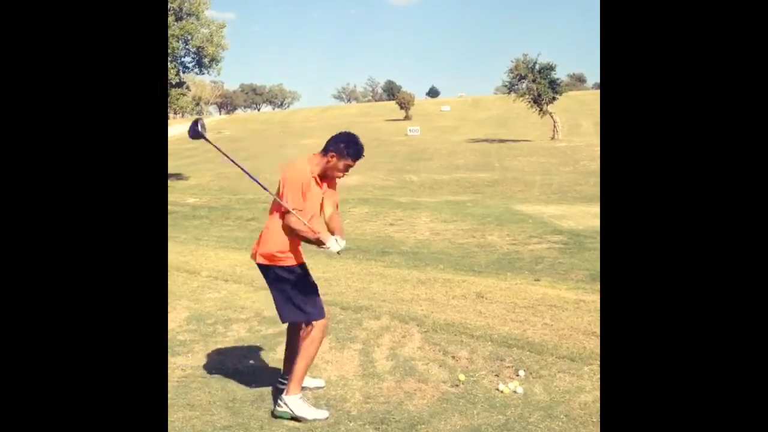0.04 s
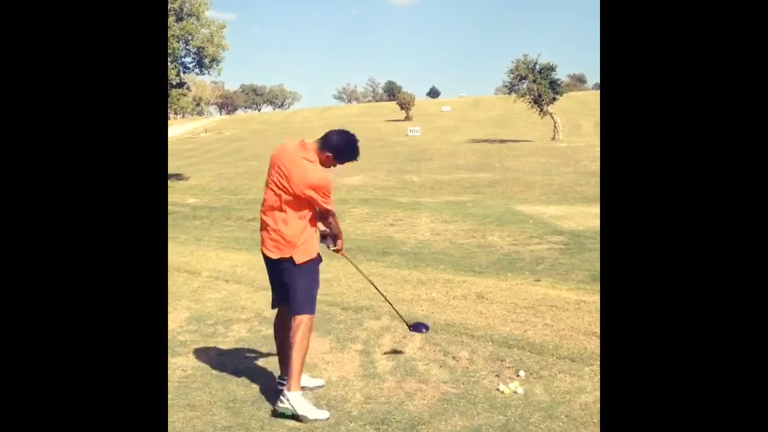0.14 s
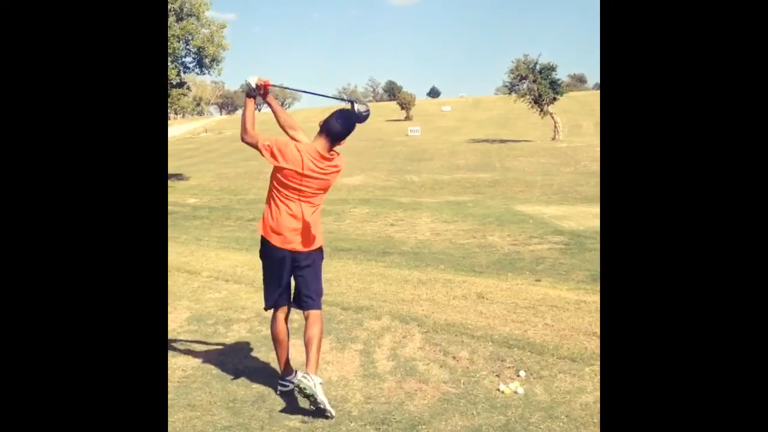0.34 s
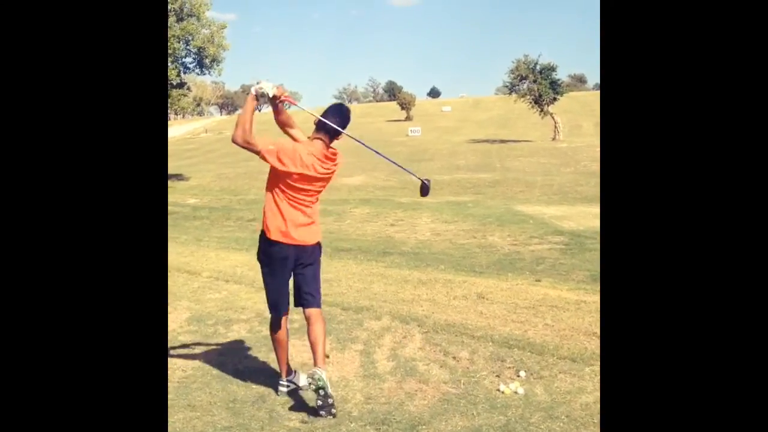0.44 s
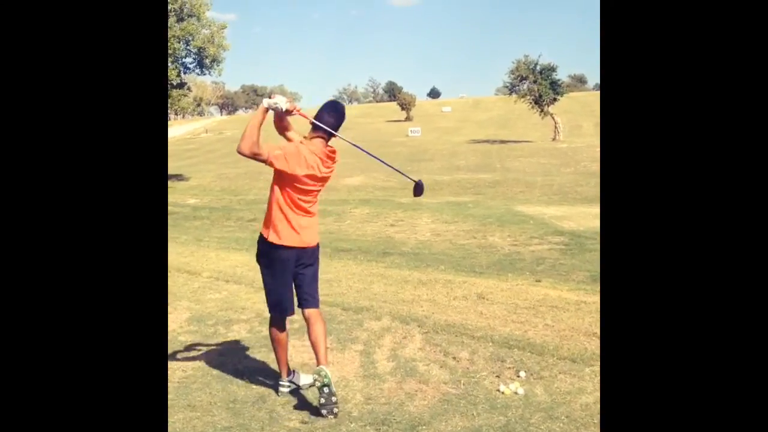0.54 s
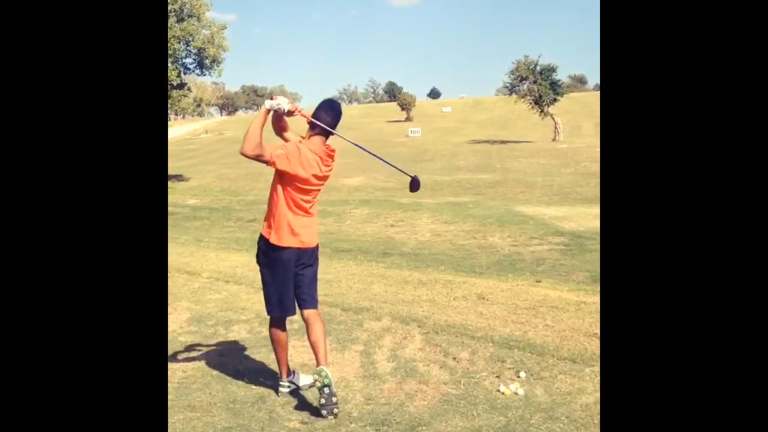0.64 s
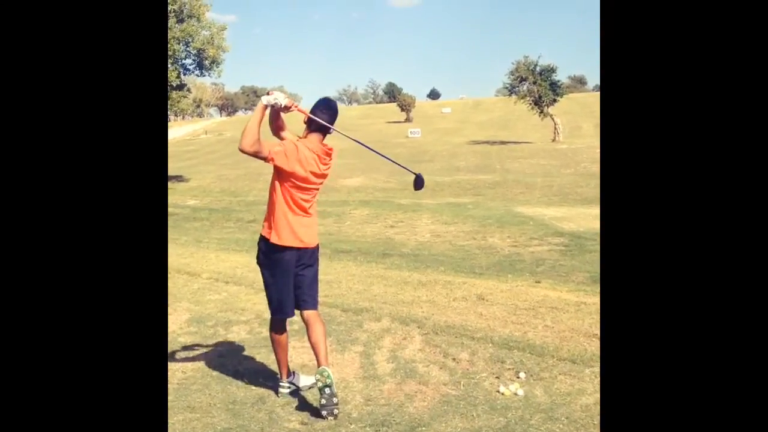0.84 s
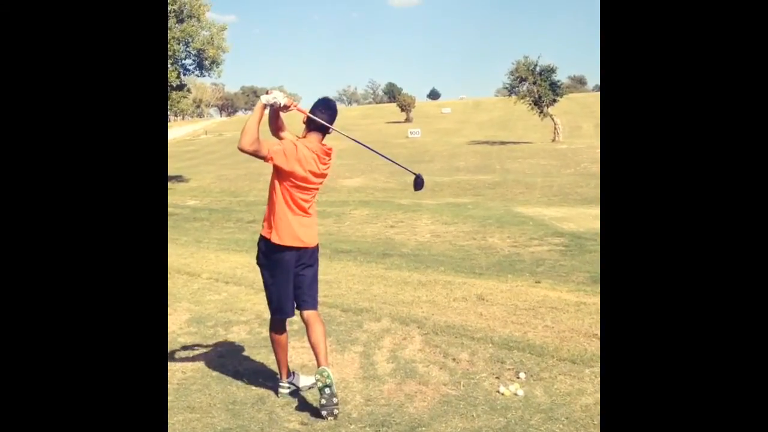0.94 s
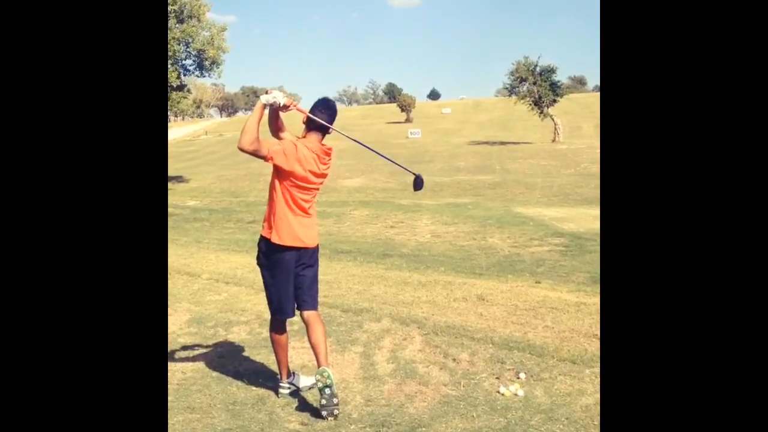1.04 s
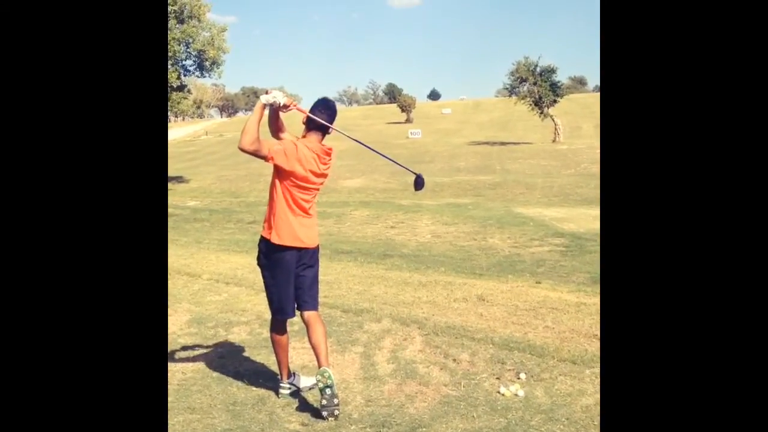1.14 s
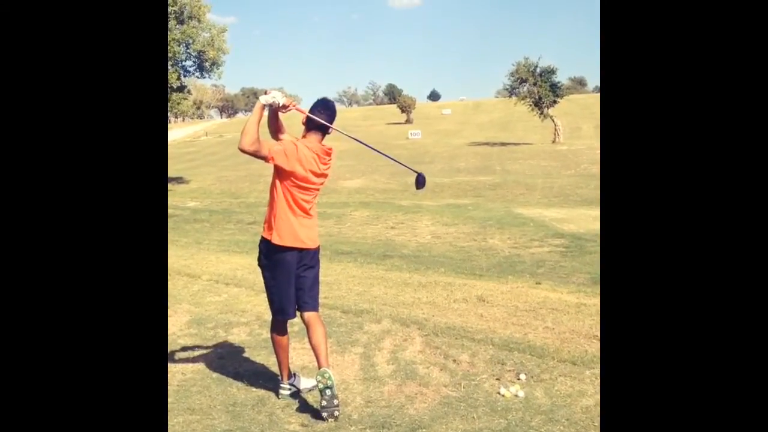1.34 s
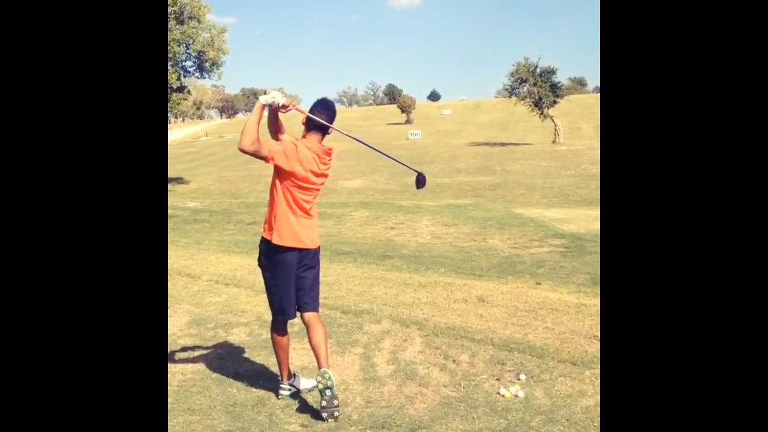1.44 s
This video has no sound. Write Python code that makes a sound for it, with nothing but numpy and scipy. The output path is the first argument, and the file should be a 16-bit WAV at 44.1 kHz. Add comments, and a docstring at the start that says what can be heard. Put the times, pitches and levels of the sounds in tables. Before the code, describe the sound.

One loud, bright golf shot outdoors: barely audible club swish, snappy metallic crack and quick high ping, faint scattered echo from distant trees, then soft rumbling wind buffets on the microphone and a few tiny ticks.

```python
"""A golf driver cracks against the ball on an open range and its hollow metal head pings on.
The hit is a sharp pulse, a low thud, bursts of coloured noise and a bank of decaying sines.
Shaped noise makes the swoosh before it, the scatter from the ground and the echo from far trees.
Light wind rocks the microphone with short low wavelets over rumble, distant hiss and a few ticks.
The recorder's gain drops at the hit and creeps back."""
import sys
import numpy as np
from scipy import signal
from scipy.fft import rfft, irfft
from scipy.io import wavfile
from scipy.ndimage import uniform_filter1d

SR = 44100
rng = np.random.default_rng(int(sys.argv[2]) if len(sys.argv) > 2 else 0)


def to_wav(sig):
    """Store sig (one row per channel, or 1-D mono) as 16-bit WAV at the path in sys.argv[1].

    Samples outside -1..1 are clipped; the rate is SR.
    """
    pcm = np.clip(np.atleast_2d(sig), -1, 1) * 32767
    pcm = np.round(pcm).astype(np.int16)
    wavfile.write(sys.argv[1], SR, pcm.T)  # frames by channels


N = 66150
T = np.arange(N) / SR  # seconds
HIT_S = 0.2063  # club meets ball


def amp(db):
    """Decibels to gain."""
    return 10 ** (np.asarray(db) / 20)


def unit(x):
    """Scales to rms 1."""
    return x / np.sqrt(np.mean(x ** 2) + 1e-20)


def noise(spectrum):
    """Noise of rms 1, coloured by points of (Hz, relative dB per Hz) joined on a log frequency axis."""
    points_hz, points_db = np.transpose(spectrum)
    hz = np.fft.rfftfreq(N, 1 / SR)
    colour_db = np.interp(np.log(hz + 1), np.log(points_hz), points_db)
    white = rfft(rng.standard_normal(N))
    return unit(irfft(white * amp(colour_db), N))


def level(curve):
    """Gain along a curve of (seconds, dB) points."""
    return amp(np.interp(T, *np.transpose(curve)))


def decay(start, t60, rise=0.00022, hold=0):
    """Envelope: linear rise, then exponential fall by 60 dB per t60, starting `hold` after the start."""
    t = T - start
    fall_db = -60 * np.maximum(t - hold, 0) / t60
    return np.clip(t / rise, 0, 1) * amp(fall_db)


SLAP_DB, SLAP_DELAY_S = 8.5, 0.00019
SLAP_HALF_S, SLAP_EDGE_S = 0.000093, 0.00004  # bell width; steepness of the swing through zero


def slap():
    """Push-pull pressure pulse as the ball flattens on the face: a steep step under a narrow bell."""
    t = T - HIT_S - SLAP_DELAY_S
    bell = np.exp(-(t / SLAP_HALF_S) ** 2)
    return -amp(SLAP_DB) * np.tanh(t / SLAP_EDGE_S) * bell


THUD_DB, THUD_HZ, THUD_S, THUD_DELAY_S = -18.5, 235, 0.0024, 0.0015


def thud():
    """Low push of air from the blow: a short cosine under a bell."""
    t = T - HIT_S - THUD_DELAY_S
    return amp(THUD_DB) * np.cos(2 * np.pi * THUD_HZ * t) * np.exp(-(t / THUD_S) ** 2)


# Colour of the crack. Each row: frequency in Hz, relative level in dB per Hz.
CRACK_COLOUR = [(40, -25), (200, -8.5), (500, -13.5), (850, 1.5), (1250, -12), (2000, -19.5), (3000, -5.5),
                (5000, -19.5), (6200, -2), (7500, -9.5), (9000, -8.5), (10300, -2), (11700, -13.5),
                (13000, -6), (15500, -19)]
CRACK_DB, CRACK_T60_S, CRACK_HOLD_S = -7.5, 0.015, 0.0022


def crack():
    """Dense, fast-dying ring of face and ball, as a burst of noise."""
    envelope = decay(HIT_S, CRACK_T60_S, rise=0.00038, hold=CRACK_HOLD_S)
    return amp(CRACK_DB) * noise(CRACK_COLOUR) * envelope


# Colour of the thin shell's sizzle. Each row: frequency in Hz, relative level in dB per Hz.
SIZZLE_COLOUR = [(1500, -25), (3000, -5.5), (4600, -2.5), (6200, -3), (7600, -6.5), (10000, -2.5),
                 (12000, -12.5), (15500, -15.5)]
SIZZLE_DB, SIZZLE_T60_S = -15.5, 0.051


def sizzle():
    """Crowded high modes of the thin shell, too dense to hear singly, so noise stands for them."""
    return amp(SIZZLE_DB) * noise(SIZZLE_COLOUR) * decay(HIT_S, SIZZLE_T60_S)


# Ringing modes of the hollow head.
# Each row: frequency at the hit in Hz, level in dB, time to fall 60 dB in seconds.
HEAD_MODES = [(793.4, -25, 0.02), (935, -18.5, 0.011), (3315, -25, 0.19), (3490, -29.5, 0.2),
              (4550, -28, 0.1), (5540, -23.5, .15), (5888, -7.5, .055), (6420, -20, 0.035),
              (6220, -12.5, .055), (6470, -21.5, 0.068), (6840, -32.5, .05), (7054, -27.5, .04),
              (8060, -18, .04), (9650, -24.5, 0.045), (10160, -22, .03), (10990, -18, 0.027)]
PING_RISE_S = 0.0028
DOPPLER_RISE, DOPPLER_S = 0.11, 0.055  # final pitch rise as a fraction; time constant of the glide


def ping():
    """Modes of the head as it flies away; their pitch rises as it slows and turns upward."""
    age = np.maximum(T - HIT_S, 0)
    # phase clock: runs at normal speed at the hit, then glides faster
    clock = age + DOPPLER_RISE * (age - DOPPLER_S * (1 - np.exp(-age / DOPPLER_S)))
    ring = np.zeros(N)
    for hz, db, t60 in HEAD_MODES:
        ring += amp(db) * decay(HIT_S, t60, PING_RISE_S) * np.sin(2 * np.pi * hz * clock)
    return ring


def strike():
    """The whole blow: pulse, thud, dense ringing and the rising ping."""
    return slap() + thud() + crack() + sizzle() + ping()


# Loudness of the club head through the air. Each row: time in seconds, level in dB.
SWING_LEVEL = [(0, -65), (.09, -95), (.13, -59), (.165, -41), (.185, -39), (.199, -35.5), (.208, -40),
               (.23, -57.5), (.3, -62.5), (.36, -83)]
# Colour of the swoosh. Each row: frequency in Hz, relative level in dB per Hz.
SWOOSH_COLOUR = [(60, -29), (160, -4.5), (300, 0.5), (550, -10.5), (880, 1), (1250, -10), (1800, -11),
                 (2700, -21), (4500, -27), (15000, -42)]
# Colour of the shaft hiss. Each row: frequency in Hz, relative level in dB per Hz.
HISS_COLOUR = [(1000, -15), (3000, 1), (6500, -1), (10000, -9.5), (15500, -8.5)]
HISS_DB, HISS_SLOPE_DB_PER_S = -46.5, 262  # level at the hit; slope on both sides of it


def swing():
    """Air torn by the club head, with a thin shaft hiss that grows to the hit and fades after it."""
    hiss_db = HISS_DB - HISS_SLOPE_DB_PER_S * abs(T - HIT_S)
    hiss = amp(hiss_db) * noise(HISS_COLOUR)
    swoosh = level(SWING_LEVEL) * noise(SWOOSH_COLOUR)
    return swoosh + hiss


# Colour of the scattered crack. Each row: frequency in Hz, relative level in dB per Hz.
SCATTER_COLOUR = [(300, -28.5), (600, -21), (1300, -22), (2000, -17.5), (2900, -13), (3500, -5.5),
                  (4100, -10), (5300, -12), (5800, -11), (6250, 6), (6700, -7.5), (7400, -11.5),
                  (10000, -17.5), (15500, -18.5)]
SCATTER_DB, SCATTER_RISE_S, SCATTER_HOLD_S, SCATTER_T60_S = -29.5, 0.02, 0.052, 0.2


def scatter():
    """The crack thrown back by the ground, smeared into a soft-edged noise tail."""
    envelope = decay(HIT_S, SCATTER_T60_S, SCATTER_RISE_S, SCATTER_HOLD_S)
    return amp(SCATTER_DB) * noise(SCATTER_COLOUR) * envelope


# Colour of the lingering ping. Each row: frequency in Hz, relative level in dB per Hz.
LINGER_COLOUR = [(1000, -23), (3000, -22), (3700, -8.5), (4400, -18), (5600, -17.5), (6200, -1.5),
                 (6800, -16.5), (8000, -20.5), (15000, -32)]
LINGER_DB, LINGER_T60_S = -37.5, 0.7


def linger():
    """The ping lingering over the range as a long, narrow-coloured noise tail."""
    return amp(LINGER_DB) * noise(LINGER_COLOUR) * decay(HIT_S, LINGER_T60_S, SCATTER_RISE_S)


# Colour of the tree echo. Each row: frequency in Hz, relative level in dB per Hz.
TREES_COLOUR = [(400, -30), (800, -32), (1200, -2.5), (1450, -20), (2000, -12.5), (4200, -3), (5100, -1),
                (5900, -6.5), (6800, -4), (7050, 2.5), (7350, 1.5), (7700, -10), (8500, -19), (15000, -35)]
TREES_S, TREES_DB, TREES_RISE_S, TREES_T60_S = 0.478, -49, 0.0244, 0.58  # TREES_S: echo's peak


def trees():
    """Soft echo from far trees: it swells exponentially to its peak, then dies away."""
    swell = np.exp(np.minimum(T - TREES_S, 0) / TREES_RISE_S)
    fall = decay(HIT_S, TREES_T60_S, hold=TREES_S - HIT_S)
    return amp(TREES_DB) * noise(TREES_COLOUR) * swell * fall


# Distinct dull reflections. Each row: centre in seconds, level in dB, half length in seconds.
REFLECTIONS = [(0.265, -43, .007), (0.491, -50.5, .005)]
# Dull colour shared with the ticks. Each row: frequency in Hz, relative level in dB per Hz.
DULL_COLOUR = [(100, 7), (400, -1), (1000, 1), (2000, -9.5), (6000, -29), (15000, -34)]


def reflections():
    """Single dull returns, each a bell-shaped puff of noise."""
    dull = np.zeros(N)
    for s, db, half in REFLECTIONS:
        dull += amp(db) * noise(DULL_COLOUR) * np.exp(-((T - s) / half) ** 2)
    return dull


# Faint ticks. Each row: start in seconds, body level in dB, body's time to fall 60 dB in seconds,
# sharp edge level in dB.
TICKS = [(0.1014, -41.5, 0.019, -45), (0.497, -50, 0.027, -36.5), (.987, -38.5, 0.0037, -30.5)]
TICK_EDGE_S = 0.00028  # time constant of the edge's fall


def ticks():
    """Small dry ticks: a dull noise body behind a one-sided click."""
    total = np.zeros(N)
    for s, db, t60, edge_db in TICKS:
        body = amp(db) * noise(DULL_COLOUR) * decay(s, t60)
        edge = amp(edge_db) * (T >= s) * np.exp(-abs(T - s) / TICK_EDGE_S)
        total += body + edge
    return total


# Eddies striking the microphone, before its low cut.
# Each row: centre in seconds, level in dB, frequency in Hz, time scale of the fall in seconds.
BUFFETS = [(.0709, -41, 126, 0.0028), (.258, -32, 160, 0.0058), (.3495, -27, 172, 0.0059),
           (.3888, -36, 148, 0.0082), (.4768, -33.5, 143, 0.0066), (.5058, -29.5, 149, 0.0053),
           (.5707, -28.5, 177, 0.0054), (.7019, -22, 186, 0.0036), (.7291, -22.5, 199.4, 0.0042),
           (.737, -24, 180, 0.0044), (.829, -26.5, 161, 0.0058), (.8425, -30, 167.6, 0.0078),
           (.8706, -28.5, 190, 0.0067), (.8802, -30, 149, 0.0052), (.942, -25.5, 195, 0.0045),
           (.9611, -27, 175, 0.013), (.9735, -23.5, 269, 0.0064), (0.9788, -14.5, 161, 0.0069),
           (.9924, -23, 200, 0.0031), (1.001, -28.5, 160, 0.0049), (1.0107, -21.5, 265, 0.00307),
           (1.018, -21.5, 232, 0.0041), (1.039, -34.5, 171, 0.0036), (1.0595, -30, 250, 0.0012),
           (1.0677, -21, 317, 0.0016), (1.074, -25, 162, 0.0045), (1.1886, -28, 174.4, 0.002),
           (1.265, -40.5, 148, 0.0054), (1.3305, -41, 180, .006), (1.4124, -27, 193, 0.0032),
           (1.4337, -32.5, 170, 0.0066), (1.4479, -47, 170, 0.0079)]
BUFFET_ATTACK, BUFFET_EDGE = 0.88, 1.8  # rise as a share of the fall; steepness of both flanks
BUFFET_SKEW_DB = -18  # overtone that makes each buffet lopsided
MIC_LOW_HZ = 61  # the microphone passes little of the buffets below this


def buffets():
    """Each eddy rocks the microphone with a short low wavelet at a random phase."""
    eddies = np.zeros(N)
    for s, db, hz, fall_s in BUFFETS:
        t = T - s
        u = t / np.where(t < 0, fall_s * BUFFET_ATTACK, fall_s)
        bump = 1 / np.cosh(np.clip(BUFFET_EDGE * u, -20, 20))
        turn = 2 * np.pi * (hz * t + rng.random())
        overtone = amp(BUFFET_SKEW_DB) * bump * np.cos(2 * turn)
        eddies += amp(db) * bump * (np.cos(turn) + overtone)
    low_cut = signal.butter(2, MIC_LOW_HZ, "high", fs=SR, output="sos")
    return signal.sosfiltfilt(low_cut, eddies)


# Loudness of the turbulence between the eddies. Each row: time in seconds, level in dB.
WIND_LEVEL = [(0, -58), (.13, -58), (.3, -45), (.42, -53.5), (.52, -44), (.65, -52.5), (.76, -40),
              (.9, -43), (1, -38), (1.13, -49.5), (1.2, -44.5), (1.24, -56), (1.3, -53.5), (1.39, -57.5),
              (1.44, -37.5), (1.5, -50)]
# Colour of that turbulence. Each row: frequency in Hz, relative level in dB per Hz.
RUMBLE_COLOUR = [(20, -38), (50, -20.5), (80, -10), (125, 3), (180, -4.5), (260, -10.5), (380, -21.5),
                 (520, -39), (700, -48), (2000, -73.5)]


def wind():
    """Eddies over the low rumble of turbulence, which swells and sinks."""
    return buffets() + level(WIND_LEVEL) * noise(RUMBLE_COLOUR)


# Colour of the distant outdoor hiss. Each row: frequency in Hz, relative level in dB per Hz.
AIR_COLOUR = [(290, -29.5), (500, -2.5), (724, -0.5), (1230, -4.5), (1430, -8.5), (1750, -4.5), (2070, -8),
              (3940, -5.5), (6120, -10), (10700, -25), (15000, -24.5)]
AIR_DB, AIR_WAVER_DB = -59.5, 0.46  # mean level; rms of its waver


def air():
    """Distant hiss whose level wavers slightly and at random."""
    waver = noise([(1, 0), (12, 0), (60, -60), (200, -120)])  # mostly slow movement
    return amp(AIR_DB + AIR_WAVER_DB * waver) * noise(AIR_COLOUR)


def scene():
    """Swing, hit and echoes in light wind, as one channel."""
    surroundings = scatter() + linger() + trees() + reflections()
    return (strike() + swing() + surroundings + ticks() + wind() + air())[None]


THRESHOLD_DB, DUCK_SHARE, RECOVER_DB_PER_S = -28.5, 0.45, 9.5  # share: dB of cut per dB over
EDGE_HZ = 15500  # top of the recorded band


def record(dry):
    """Gain control ducks with loud peaks and recovers slowly; then a low-pass limits the band."""
    power = abs(uniform_filter1d(dry[0] ** 2, size=220))  # 5 ms mean
    power_db = 10 * np.log10(power + 1e-12)
    recovery = RECOVER_DB_PER_S * T
    # running peak that sinks at the recovery rate
    held_db = np.maximum.accumulate(power_db + recovery) - recovery
    over_db = np.maximum(held_db - THRESHOLD_DB, 0)
    ducked = dry * amp(-DUCK_SHARE * over_db)
    low_pass = signal.firwin(255, EDGE_HZ, window=("kaiser", 8), fs=SR)
    return signal.oaconvolve(ducked, low_pass[None], "same")


dry = scene()
out = record(dry)
to_wav(out)
```